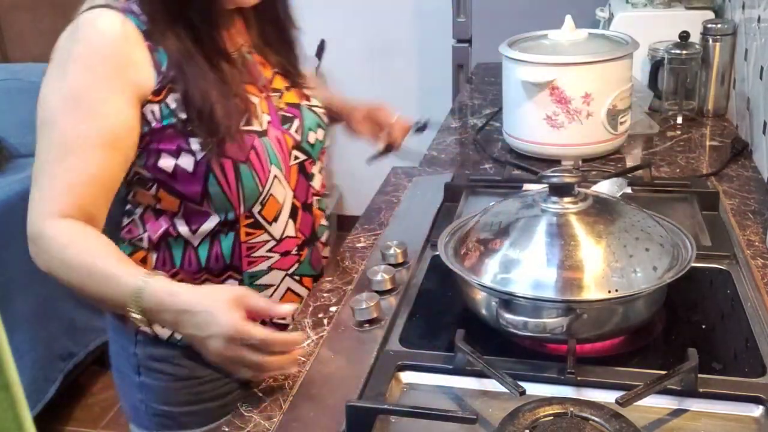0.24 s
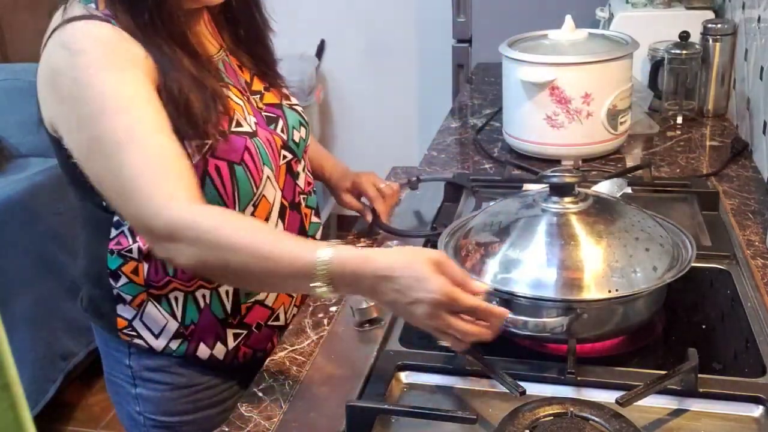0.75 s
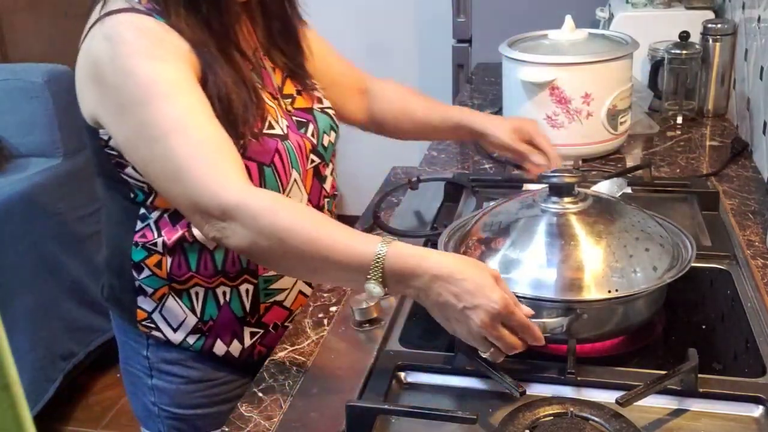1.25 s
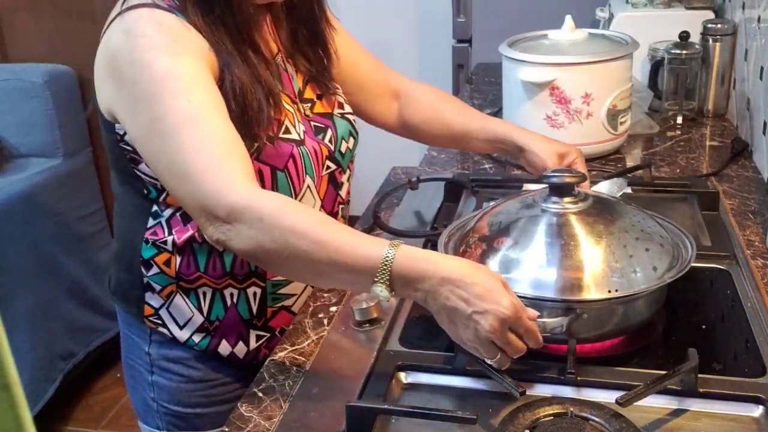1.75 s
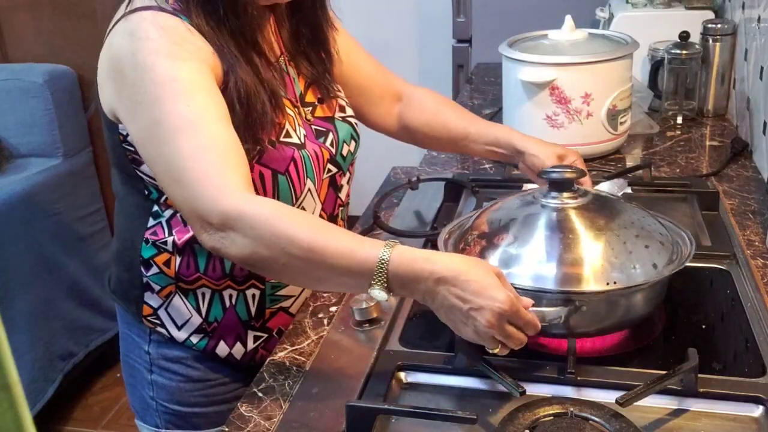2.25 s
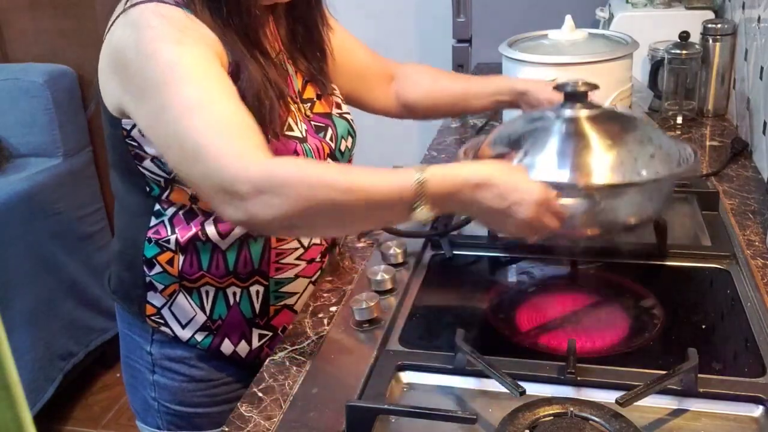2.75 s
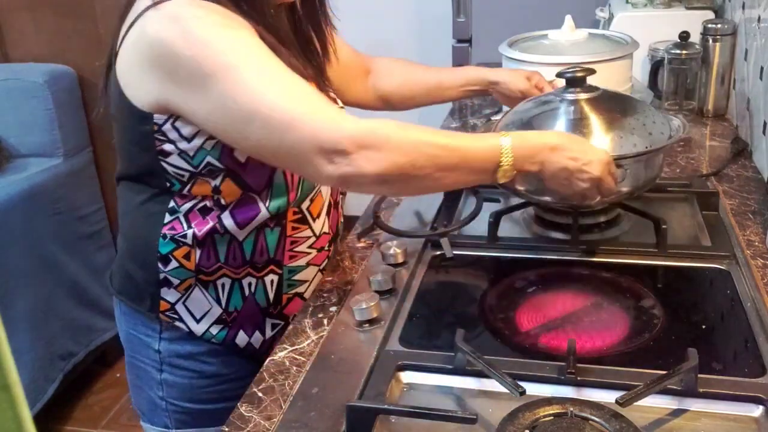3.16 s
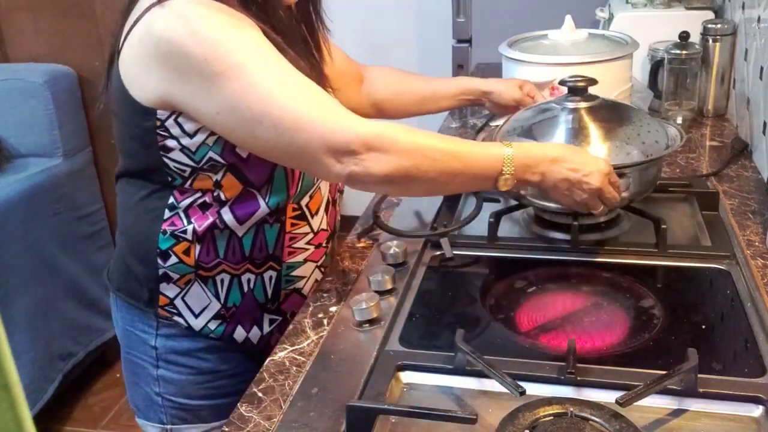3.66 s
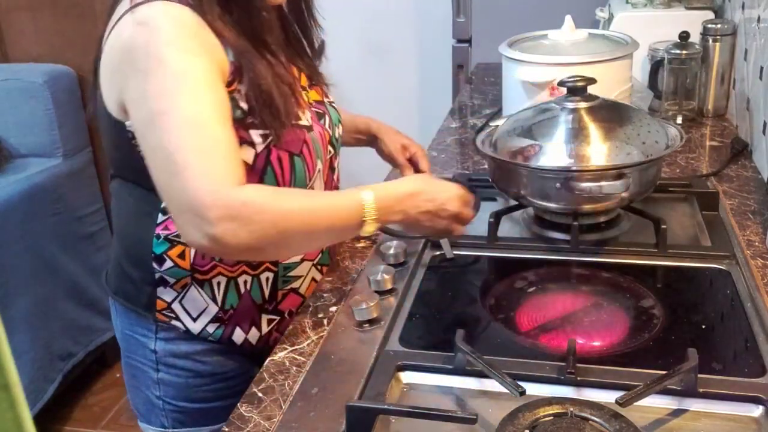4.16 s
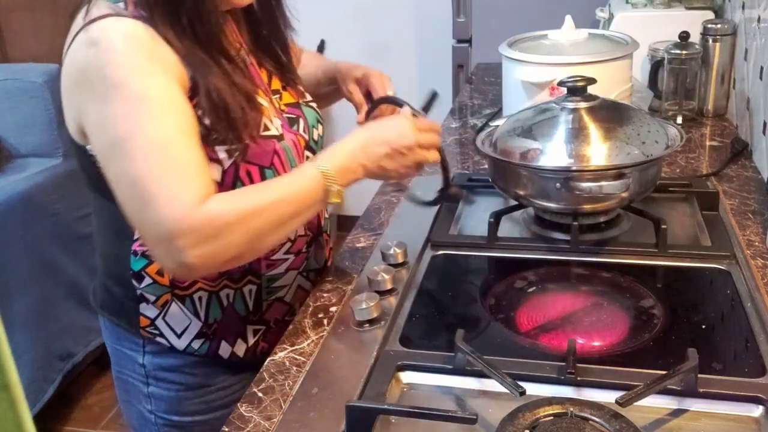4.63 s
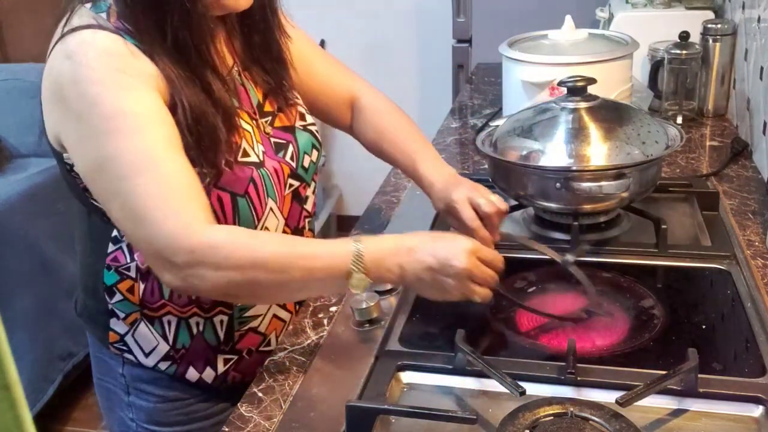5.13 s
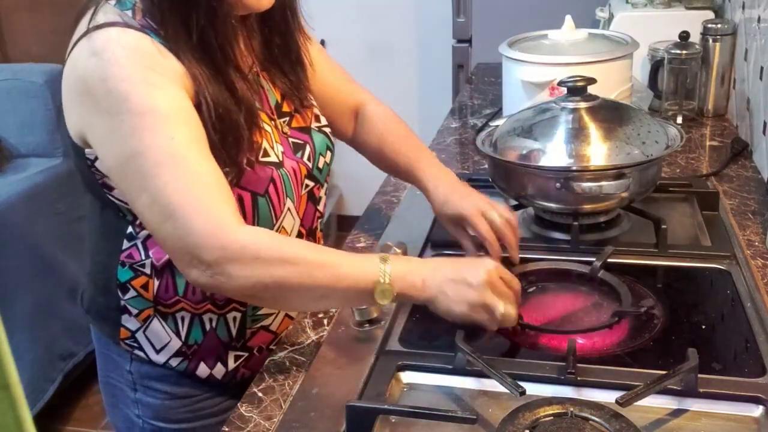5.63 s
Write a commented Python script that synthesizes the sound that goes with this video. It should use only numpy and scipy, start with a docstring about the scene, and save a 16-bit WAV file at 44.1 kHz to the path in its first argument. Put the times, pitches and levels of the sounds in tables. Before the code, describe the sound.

In a small kitchen, stew bubbles softly in a lidded steel pot with a faint hiss of steam. An iron pan support briefly rattles against the pot. The simmer dies away as the pot is lifted, and it lands on another burner with a thud and a short scrape. The support is then picked up and clanks down sharply on the metal hob. The sounds are close, over a faint low hum.

```python
"""Stew simmers in a lidded steel pot on an electric hob: bubbles excite resonances, steam hisses at the rim.
Early on, an iron pan support knocks the pot, each impact setting the modes of the metal ringing.
The pot is lifted away and the simmer dies down; it lands on a gas burner, scrapes by stick-slip friction
and settles. Last, the support is picked up and clanks down on the sheet-metal hob.
Throughout, a small kitchen reverberates over a low hum."""
import sys
import numpy as np
from scipy import signal
from scipy.fft import rfft, irfft
from scipy.io import wavfile
from scipy.ndimage import uniform_filter1d

SR = 44100
rng = np.random.default_rng(int(sys.argv[2]) if len(sys.argv) > 2 else 0)


def pcm_store(signal):
    """Save signal as 16-bit PCM."""
    levels = np.round(np.clip(np.atleast_2d(signal), -1, 1) * 32767)
    wavfile.write(sys.argv[1], SR, levels.astype(np.int16).T)


N = 259749


def simmer():
    """Superposition: bubbles, steam and droplets add, each under its own envelope."""
    return (stew() * boiling(-47.5, spurt_share=0.16, slosh_share=0.35, calm_s=2.44, db_per_s=28.5)
            + surface() * boiling(-83.5, spurt_share=0.68, slosh_share=1.4, calm_s=2.54, db_per_s=45)
            + steam() * boiling(-73.5, spurt_share=0.12, slosh_share=0.34, calm_s=2.45, db_per_s=67)
            + droplets() * boiling(-74, spurt_share=0.84, slosh_share=0, calm_s=2.346, db_per_s=81))


# resonances through which the big bubbles sound: (frequency [Hz], bandwidth [Hz], level [dB])
STEW_RESONANCES = [(137.3, 15, 5.5), (145, 25, 0.5), (263.2, 30.3, 11.5), (284.8, 40, 8.5),
                   (351.7, 60.6, 2), (384.3, 63.8, 4.5), (428, 42, -8)]
def stew():
    """Impulse response: each bubble collapsing under the lid excites resonances that swell and die."""
    t = np.arange(SR // 4) / SR
    bubble = sum(amp(db) * width ** 3 * t ** 2 * np.exp(-2 * np.pi * width * t)
                 * np.sin(2 * np.pi * hz * t) for hz, width, db in STEW_RESONANCES)
    return unit_rms(signal.oaconvolve(pops(per_s=420, spread_db=4.5), bubble[None], axes=1)[:, :N])


# pitches favoured by the sizes of the surface bubbles: (frequency [Hz], level [dB])
BUBBLE_PITCHES = [(600, -13), (720, -4.5), (840, 3.5), (950, 0), (1080, -11.5), (1250, -19), (1500, -13.5),
                  (1800, -10), (2400, -35.5)]
def surface(per_s=600, cycles=7, glide=0.015, spread_db=3.3, sizes=40):
    """Bubble resonance: each small bubble rings at a pitch set by its size, rising as it opens."""
    t, out = np.arange(SR // 20) / SR, np.zeros((2, N))
    for hz in np.geomspace(BUBBLE_PITCHES[0][0], BUBBLE_PITCHES[-1][0], sizes):
        age = t * hz / cycles
        envelope = amp(lookup(BUBBLE_PITCHES, hz)) * age * np.exp(-2 * age)
        blip = envelope * np.sin(2 * np.pi * cycles * age * (1 + glide * age))
        for when, rank, side in rng.random((int(per_s * N / SR / sizes), 3)):
            strength = amp(-spread_db * np.log(rank + 0.0021))  # many weak, a few strong
            pan = [np.cos(2 * np.pi * side), np.sin(2 * np.pi * side)]
            add(out, when * N / SR, strength * np.outer(pan, blip))
    return unit_rms(out)


# hiss at the rim: (frequency [Hz], spectral density [dB])
HISS_SPECTRUM = [(600, -23), (1200, -16.5), (1600, -19), (2100, -2.5), (2600, 9.5), (3250, -16),
                 (4500, -17.5)]
def steam(sag_db_per_s=6):
    """Flow noise: steam escaping at the rim makes a hiss that dwindles."""
    hiss = coloured(rng.standard_normal((2, N)), HISS_SPECTRUM)
    return sputter(hiss, patchy_db=6) * amp(-sag_db_per_s * np.arange(N) / SR)


# sizzle at the rim: (frequency [Hz], spectral density [dB])
SIZZLE_SPECTRUM = [(2000, -43), (3400, -20), (4300, -16.5), (5300, -10), (5800, -14), (6300, -5.5),
                   (6900, -0.5), (7500, -7), (8200, -16)]
def droplets():
    """Shot noise: dense tiny bursts merge into a sizzle."""
    return sputter(coloured(pops(per_s=2500, spread_db=3.5), SIZZLE_SPECTRUM), patchy_db=4.5)


def pops(per_s, spread_db):
    """Poisson process: independent bursts, many small and a few large."""
    impulses = (rng.random((2, N)) < per_s / SR) * rng.choice([-1, 1], (2, N))
    return impulses * amp(spread_db * np.minimum(rng.exponential(1, (2, N)), 4))


def sputter(x, patchy_db):
    """Random modulation: steam leaves the rim in uneven spurts, each with its own colour."""
    spectra = signal.stft(x, SR, nperseg=512)[2]
    patches = uniform_filter1d(rng.standard_normal(spectra.shape[1:]), size=9, axis=0)
    patches = uniform_filter1d(patches, size=11, axis=1)
    spectra *= amp(patchy_db * patches / patches.std())
    return unit_rms(signal.istft(spectra, SR, nperseg=512)[1][:, :N])


# steam pushes out under the lid: (time [s], duration [s], rise at a share of 1 [dB])
STEAM_SPURTS = [(0.41, 0.3, 13), (1.214, 0.16, 6), (1.646, 0.37, 6.5), (2.10, 0.24, 10)]
# the stew sloshes as the pot is carried: (time [s], duration [s], rise at a share of 1 [dB])
STEW_SLOSHES = [(2.41, 0.4, 5.5), (2.82, 0.054, 10)]
def boiling(db, spurt_share, slosh_share, calm_s, db_per_s):
    """Amplitude envelope: a steady simmer with surges, decaying exponentially once off the heat."""
    surge_db = spurt_share * surges(STEAM_SPURTS) + slosh_share * surges(STEW_SLOSHES)
    cooling_db = db_per_s * np.maximum(np.arange(N) / SR - calm_s, 0)
    return amp(db + surge_db - cooling_db)


def surges(rows, attack_s=0.013, release_s=0.1):
    """Relaxation: each rise in level opens quickly, holds and dies away."""
    t = np.arange(N) / SR
    return sum(db * np.clip((t - s) / attack_s, 0, 1) * np.exp(-np.maximum(t - s - hold, 0) / release_s)
               for s, hold, db in rows)


# the support meets the hob: (time [s], level [dB], hardness [dB], bright band [Hz], rebound delay [s])
SUPPORT_CLANKS = [(4.3, -40, -33, 2200, .03), (4.449, -28.5, -13, 2800, 0.022),
                  (4.4564, -24, -2, 3500, .007), (4.581, -21.5, -3.5, 2750, .027),
                  (4.779, -57.5, -24.5, 2450, 0.027), (5.31, -13.5, 2.5, 5590, 0.015),
                  (5.457, -15, 1, 5700, 0.024), (5.7587, -17, 10.5, 6600, 0.011)]
# balance of a clank: (thud [dB], clank [dB], bite [dB], tick [dB], steel [dB], iron [dB])
CLANK_BALANCE = [0.5, -9, -11, -20.5, -34.5, -27]
# modes of the sheet-metal hob top: (frequency [Hz], level [dB], T60 [s])
HOB_MODES = [(101.8, -22, .45), (132.4, -14.5, 0.15), (156, -5, 0.12), (244.5, -4, 0.19),
             (300.6, -12, 0.12), (335.5, -12.5, 0.2), (372.4, 3, 0.075), (409, -4.5, 0.055),
             (470.8, -0.5, 0.11), (533, -15.5, 0.28), (658, 3.5, 0.18), (730, -7.5, 0.18), (849, 5.5, 0.11),
             (893.5, -7, 0.022), (990, -16.5, 0.12), (1055, -12, 0.065), (1149, -8.5, 0.14)]
def support_clanks(halving_db=18, rebound_db=-9, contact_s=0.0059, rebound_contact_s=0.016):
    """Elastic impact: one foot lands, another follows more softly; harder contacts are shorter."""
    rows = []
    for s, db, hard_db, bright_hz, delay in SUPPORT_CLANKS:
        softness = 2 ** (-hard_db / halving_db)
        rows += [(s, db, hard_db, contact_s * softness, bright_hz),
                 (s + delay, db + rebound_db, hard_db, rebound_contact_s * softness, bright_hz)]
    return impacts(rows, HOB_MODES, CLANK_BALANCE, body_db=-7, crack_db=2.78,
                   rise_s=0.0018, attack_s=0.001)


POT_BRIGHT_HZ = 7000  # the band that contacts with the pot favour
# the pot lands and rocks on the burner: (time [s], level [dB], hardness [dB], contact time [s])
POT_JOLTS = [(3.241, -46.5, -4.5, 0.023), (3.270, -47.5, -25, 0.011), (3.531, -23, -6.5, 0.068),
             (3.556, -18.5, -2.5, 0.029), (3.73, -20, 2.5, .028), (3.93, -30.5, -19, 0.016),
             (3.998, -46, -44, .006)]
# balance of a jolt: (thud [dB], clank [dB], bite [dB], tick [dB], steel [dB], iron [dB])
JOLT_BALANCE = [-1.5, -21.5, -19.5, -18, -27.5, -37.5]
# low modes of the full pot on the burner: (frequency [Hz], level [dB], T60 [s])
POT_MODES = [(101.9, -16.5, 0.64), (159, -29.5, 0.17), (251.1, -1, 0.2), (263.7, -0.5, 0.05),
             (309, 2, 0.15), (350.5, -25, 0.25), (387.1, 0.5, 0.15), (446, -18.5, 0.27), (475, -10, 0.15),
             (583, -15.5, 0.06), (678, -7.5, 0.095), (770, -2, 0.079), (1053, -8, 0.053)]
def pot_on_burner(slips=4, slip_db=-32, slip_hard_db=1.5, slip_contact_s=0.019):
    """Impact and stick-slip friction: the heavy pot lands, drags in nearly even steps and settles."""
    slip_times = np.linspace(3.62, 3.695, slips) + 0.005 * rng.standard_normal(slips)
    drag = [(s, slip_db, slip_hard_db, slip_contact_s) for s in slip_times]
    rows = [(*row, POT_BRIGHT_HZ) for row in POT_JOLTS + drag]
    return impacts(rows, POT_MODES, JOLT_BALANCE, body_db=-5, crack_db=-0.1,
                   rise_s=0.0069, attack_s=0.0075)


# the support strikes the pot: (time [s], level [dB], hardness [dB], contact time [s])
SUPPORT_KNOCKS = [(0.760, -26, 11, 0.063), (0.804, -20.5, -6.5, 0.019), (0.816, -26.5, 0, 0.021),
                  (0.834, -25.5, 0.5, 0.041), (0.901, -25.5, -11, 0.066)]
# balance of a knock: (thud [dB], clank [dB], bite [dB], tick [dB], steel [dB], iron [dB])
KNOCK_BALANCE = [-0.5, -17.5, -14, -20.5, -16.5, -28.5]
def support_knocks():
    """Structure-borne sound: the support rattles against the pot and the hob beneath resounds."""
    rows = [(*row, POT_BRIGHT_HZ) for row in SUPPORT_KNOCKS]
    return impacts(rows, HOB_MODES, KNOCK_BALANCE, body_db=-8, crack_db=-1.5,
                   rise_s=0.00043, attack_s=0.0027)


# a hand takes the pot's handle: (time [s], level [dB], hardness [dB], contact time [s])
HANDLE_GRASPS = [(2.059, -58, 0, .003)]
# balance of a grasp: (thud [dB], clank [dB], bite [dB], tick [dB], steel [dB], iron [dB])
GRASP_BALANCE = [2, 2, -3.5, -40, -37.5, -32]
def handle():
    """Soft impact: a hand on the handle excites little treble, so the tick is dull."""
    rows = [(*row, POT_BRIGHT_HZ) for row in HANDLE_GRASPS]
    return impacts(rows, HOB_MODES, GRASP_BALANCE, body_db=-6, crack_db=1.5,
                   rise_s=0.001, attack_s=0.001)


# modes of the pot's steel wall and lid: (frequency [Hz], level [dB], T60 [s])
STEEL_MODES = [(620, -7.5, 0.36), (759, -7.5, 0.57), (898, -5.5, 0.16), (1712, -24.5, 0.7),
               (1710, -32, 0.29), (2230, -25, 0.12), (2760, -26.5, .4), (3586, -12.5, 0.11),
               (3870, -25, 0.53), (4090, -24, 0.48), (4446, -11.5, 0.39), (4820, -19, 0.34),
               (5390, -8, 0.3), (5500, -20, 0.47), (5770, -12.5, 0.17), (6040, -27.5, .35), (6250, -16, .3),
               (6970, -6.5, 0.15), (6660, -9, 0.17), (6980, -1.5, 0.25), (7020, -4.5, 0.063),
               (7440, 10.5, 0.093), (8000, -5.5, .25)]
# modes of the cast-iron support, damped by hand or load: (frequency [Hz], level [dB], T60 [s])
IRON_MODES = [(1795, -10, 0.22), (2160, -10.5, 0.16), (2365, -10.5, .45), (2625, -7, 0.16),
              (2912, -16.5, 0.053), (2910, -5.5, 0.14), (2930, -4, 0.05), (3550, -6, 0.043),
              (3747, -4.5, 0.11), (4270, -5, .1), (4590, -1, 0.12), (5020, -4.5, 0.1), (5350, -19, 0.035),
              (5630, -5, 0.057), (6350, -3.5, 0.054), (7120, 0.5, 0.072), (7330, -8.5, 0.17)]
# the crowd of short-lived modes in each contact: (frequency [Hz], spectral density [dB])
CRACK_SPECTRUM = [(20, -43), (55, -22.5), (110, -3), (400, 6), (600, 9), (900, 5), (1170, 3), (1330, -11),
                  (1700, -6), (2200, -9), (2850, -2), (3300, -5.5), (7300, -1), (7800, -4.5), (8300, -2)]
# centres of the crack's bands: (thud [Hz], clank [Hz], bite [Hz], tick [Hz])
BAND_CENTRES = [380, 800, 2600, 6000]
# share of the hardness that reaches each part: (thud, clank, bite, tick, steel, iron) [0-1]
HARDNESS_SHARES = [0, 0.47, 0.44, 0.74, 1, 0.44]
def impacts(rows, modes, balance_db, body_db, crack_db, rise_s, attack_s):
    """Modal response: a brief crack, low body modes and ringing steel and iron; harder is brighter."""
    t, out = np.arange(SR // 2) / SR, np.zeros((2, N))
    hz, onset = bins(len(t)), 1 - np.exp(-t / attack_s)
    body = ringing(modes, t) * (1 - np.exp(-t / rise_s))  # heavy parts take a moment to move
    steel = ringing(STEEL_MODES, t)
    low = np.transpose(modes)[0] < 570  # thud below this frequency, clank above
    for s, db, hard_db, contact_s, bright_hz in rows:
        parts_db = db + np.array(balance_db) + hard_db * np.array(HARDNESS_SHARES)
        thud_db, clank_db, bite_db, tick_db, steel_db, iron_db = parts_db
        thud = amp(thud_db) * excite(body[low], spread_db=0, scatter_rad=0.84)
        clank = amp(clank_db) * excite(body[~low], spread_db=4, scatter_rad=2)
        iron = ringing(loaded(IRON_MODES, shift=0.012), t)
        iron *= amp(contact_lift(np.array(IRON_MODES)[:, :1], bright_hz))
        iron_db += 0.6 * contact_lift(2800, bright_hz)  # stirring this band makes the iron ring out
        ring = amp(steel_db) * excite(steel, spread_db=4, scatter_rad=1.6)
        ring += amp(iron_db) * excite(iron, spread_db=3.5, scatter_rad=3.6)
        colour_db = np.interp(np.log(hz + 1), np.log(BAND_CENTRES), [thud_db, clank_db, bite_db, tick_db])
        colour_db += contact_lift(hz, bright_hz) + lookup(CRACK_SPECTRUM, hz) + crack_db
        crack = irfft(rfft(rng.standard_normal((2, len(t)))) * amp(colour_db), len(t))
        fade = unit_hit((np.exp(-t / contact_s) * onset)[None])
        add(out, s, amp(body_db) * (thud + clank) + crack * fade + ring * onset)
    # small panels radiate hardly any deep bass
    return signal.sosfilt(signal.butter(4, 79, "high", fs=SR, output="sos"), out)


def ringing(modes, t):
    """Damped oscillation: each mode is a decaying complex exponential."""
    hz, db, t60 = np.transpose(modes)[:, :, None]
    return amp(db - 60 * t / t60) * np.exp(2j * np.pi * hz * t)


def excite(rings, spread_db, scatter_rad):
    """Modal superposition: each contact stirs the modes with its own strengths and phases."""
    shape = (2, len(rings))
    strengths = amp(spread_db * rng.standard_normal(shape))
    phases = np.exp(1j * scatter_rad * rng.standard_normal(shape))
    return unit_hit(-((strengths * phases) @ rings).imag)


def loaded(modes, shift):
    """Boundary conditions: grip and points of support change with each blow and detune the modes."""
    hz, db, t60 = np.transpose(modes)
    return np.transpose([hz * (1 + shift * rng.standard_normal(len(hz))), db, t60])


def contact_lift(hz, bright_hz, lift_db=6.5, octaves=0.3):
    """Selective excitation: the point of contact lifts one band of the treble."""
    return lift_db * np.exp(-(np.log2((hz + 1) / bright_hz) / octaves) ** 2)


# the support clinks as it is grasped: (time [s], level [dB])
SUPPORT_CLINKS = [(4.280, -61), (4.297, -62)]
# modes of the barely touched support: (frequency [Hz], level [dB], T60 [s])
FREE_IRON_MODES = [(970, 3.5, 0.033), (1060, 6.5, 0.068), (1320, -10, 0.11), (2410, -18.5, 0.21),
                   (3250, -27, .14), (4370, -24.5, 0.11), (5380, -19.5, 0.15), (6800, -27.5, 0.14),
                   (7450, -4.5, .09)]
# the lid shifts as the pot touches down: (time [s], level [dB])
LID_CLINKS = [(3.236, -67)]
# modes of the lid's rim: (frequency [Hz], level [dB], T60 [s])
LID_MODES = [(2170, -20, 0.18), (2910, -9, 0.17), (3770, -5.5, 0.1), (5000, -0.5, 0.133), (5040, 9.5, 0.21),
             (6288, -5, 0.17), (7550, -8.5, .22)]
def clinks():
    """Free vibration: support and lid chime faintly after a light touch."""
    t, out = np.arange(SR // 2) / SR, np.zeros((2, N))
    for rows, modes, attack_s in (SUPPORT_CLINKS, FREE_IRON_MODES, 0.005), (LID_CLINKS, LID_MODES, 0.0028):
        rings = ringing(modes, t) * (1 - np.exp(-t / attack_s))
        for s, db in rows:
            add(out, s, amp(db) * excite(rings, spread_db=1.5, scatter_rad=2))
    return out


# reverberation time of the kitchen: (frequency [Hz], T60 [s])
ROOM_DECAY = [(100, .55), (260, 0.28), (700, 0.46), (1900, 0.42), (5000, 0.35), (8000, 0.4)]
# strength of its reflections: (frequency [Hz], level [dB])
ROOM_LEVEL = [(100, 0.5), (400, -6), (900, -6), (2500, -5), (7000, -7)]
def kitchen(x, build_s=0.012):
    """Reverberation: dense reflections build up within milliseconds and die band by band."""
    hz, t, spectra = signal.stft(rng.standard_normal((2, SR * 2 // 3)), SR, nperseg=256)
    t60 = lookup(ROOM_DECAY, hz)[:, None]
    spectra *= amp(lookup(ROOM_LEVEL, hz)[:, None] - 60 * t / t60)
    spectra *= np.sqrt(2 * np.log(1000) / (t60 * SR))  # energy independent of decay time
    tail = signal.istft(spectra, SR, nperseg=256)[1]
    tail *= 1 - np.exp(-np.arange(tail.shape[1]) / SR / build_s)
    return x + signal.fftconvolve(x, tail, axes=1)[:, :N]


# low rumble of the room: (frequency [Hz], spectral density [dB])
RUMBLE_SPECTRUM = [(20, -9.5), (50, -23), (75, -8.5), (95, 5), (125, -6), (170, -10), (250, -29),
                   (350, -36.5), (700, -49.5), (1300, -52.5), (8000, -58)]
# tones of the hum: (frequency [Hz], level [dB])
HUM_TONES = [(101, -71), (121, -65)]
def background(rumble_db=-60):
    """Beating: two hum tones of slowly wandering phase interfere over a low rumble."""
    t = np.arange(N) / SR
    wander = unit_rms(irfft(rfft(rng.standard_normal((len(HUM_TONES), N))) * (bins(N) < 3), N))
    hum = sum(amp(db) * np.sqrt(2) * np.sin(2 * np.pi * hz * t + 0.2 * drift)
              for (hz, db), drift in zip(HUM_TONES, wander))
    return amp(rumble_db) * coloured(rng.standard_normal((2, N)), RUMBLE_SPECTRUM) + hum


def amp(db):
    """Amplitude ratio of a level in decibels."""
    return 10 ** (np.asarray(db) / 20)


def unit_rms(x):
    """Normalisation of each channel to rms 1."""
    return x / np.sqrt(np.mean(x ** 2, -1, keepdims=True) + 1e-20)


def unit_hit(x):
    """Normalisation of a hit to rms 1 over its first 30 ms."""
    return x / np.sqrt(np.mean(x[:, :int(0.03 * SR)] ** 2, 1, keepdims=True) + 1e-20)


def lookup(points, hz, column=1):
    """Interpolation of a table column on a log-frequency axis."""
    table = np.transpose(points)
    return np.interp(np.log(hz + 1), np.log(table[0] + 1), table[column])


def bins(size):
    """Fourier frequencies for so many samples."""
    return np.fft.rfftfreq(size, 1 / SR)


def coloured(x, spectrum):
    """Filtering of x by a spectrum, at rms 1."""
    return unit_rms(irfft(rfft(x) * amp(lookup(spectrum, bins(N))), N))


def add(mix, s, sound):
    """Superposition of a sound on the mix at time s."""
    part = mix[:, round(s * SR):][:, :sound.shape[1]]
    part += sound[:, :part.shape[1]]


def scene():
    """Direct and reverberant sound of pot, support and simmer, over the background."""
    direct = clinks() + support_knocks() + handle() + pot_on_burner() + support_clanks() + simmer()
    return kitchen(direct) + background()


# two microphone ports: (frequency [Hz], coherence [0-1], left minus right [dB], left lead [rad])
MIC_PORTS = [(59.5, 1, 0, -1.3), (378, 0.94, 4.5, .1), (620, 0, 0, 0.079), (970, 1, 1, 1),
             (1490, 0.8, 0.5, 0.93), (2540, 0.11, 1, .3), (4200, 0.1, 1.5, -2.5), (6500, 0.5, 10.5, -2.1),
             (8300, 0, -4, -2.6)]
def record(dry, edge_hz=7800):
    """Partial coherence: two ports hear the bass alike and the treble differently, then a low-pass."""
    hz, _, (left, other) = signal.stft(dry, SR, nperseg=512, noverlap=384)
    coherence, side_db, lead = (lookup(MIC_PORTS, hz[:, None], column) for column in (1, 2, 3))
    right = (coherence * left + np.sqrt(1 - coherence ** 2) * other) * np.exp(-1j * lead)
    spectra = np.array([left * amp(side_db / 2), right * amp(-side_db / 2)])
    pair = signal.istft(spectra, SR, nperseg=512, noverlap=384)[1]
    lowpass = signal.firwin(151, edge_hz, window=("kaiser", 7), fs=SR)
    return signal.oaconvolve(pair[:, :N], lowpass[None], "same")


dry = scene()
out = record(dry)
pcm_store(out)
```